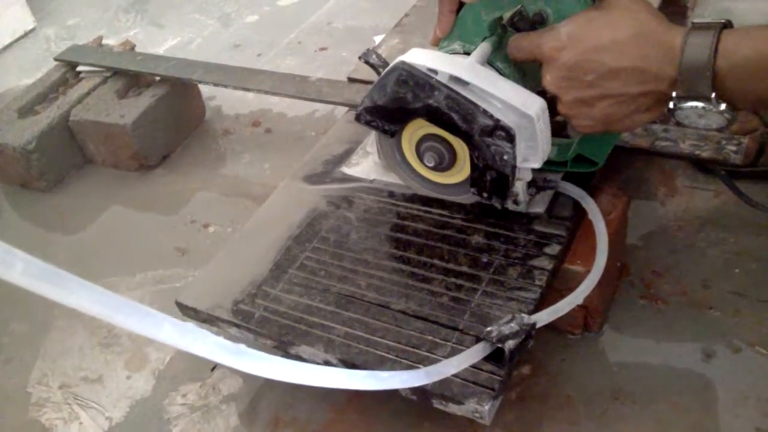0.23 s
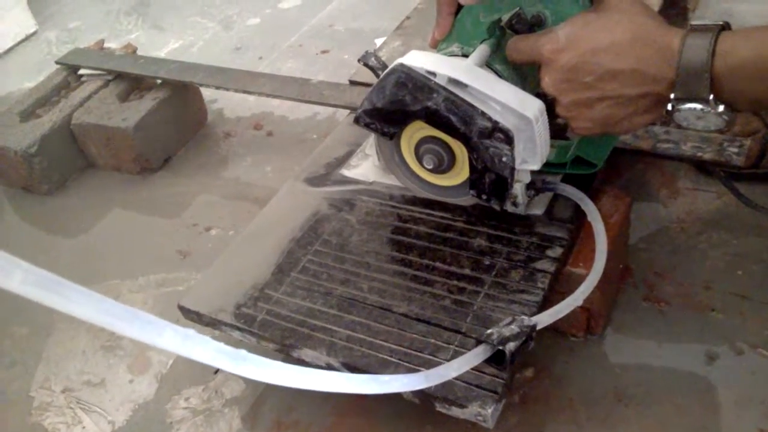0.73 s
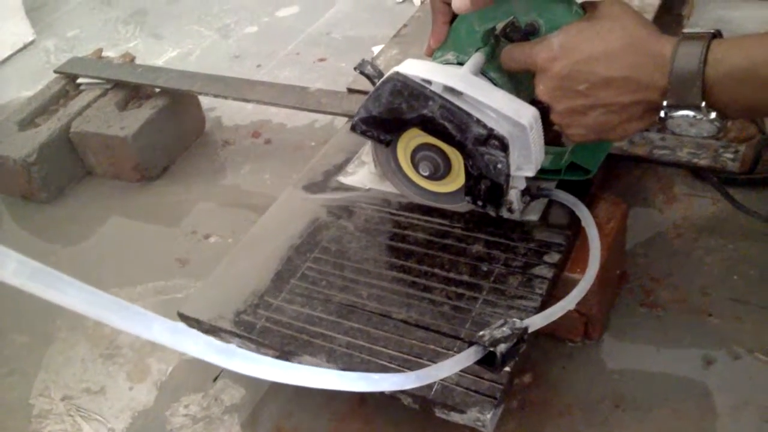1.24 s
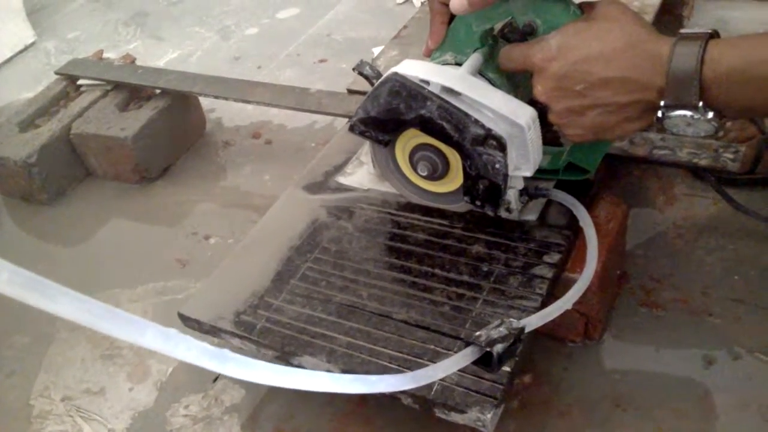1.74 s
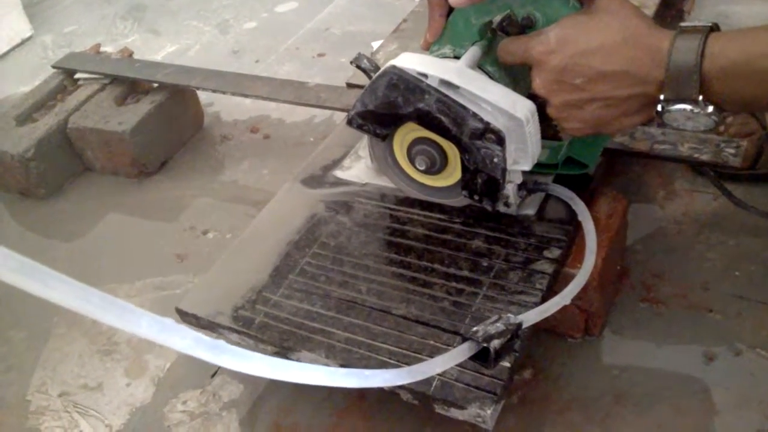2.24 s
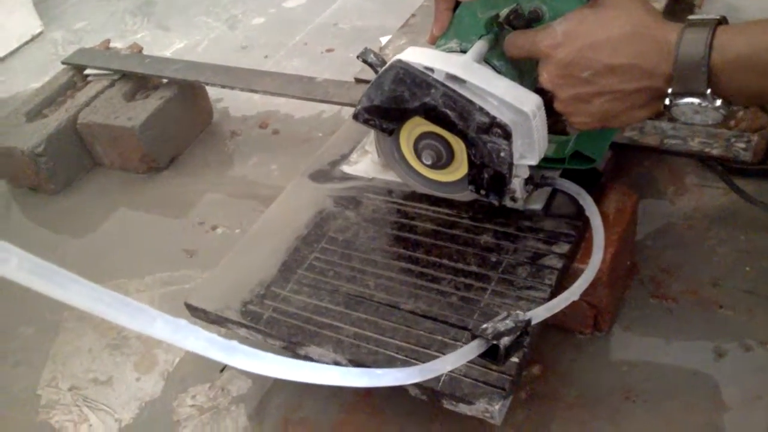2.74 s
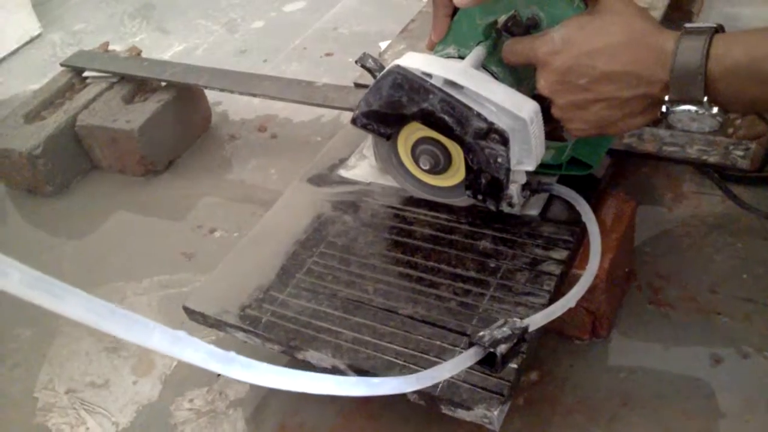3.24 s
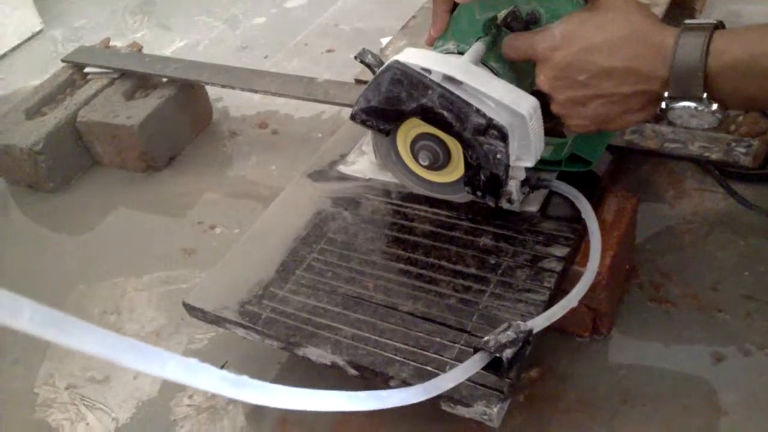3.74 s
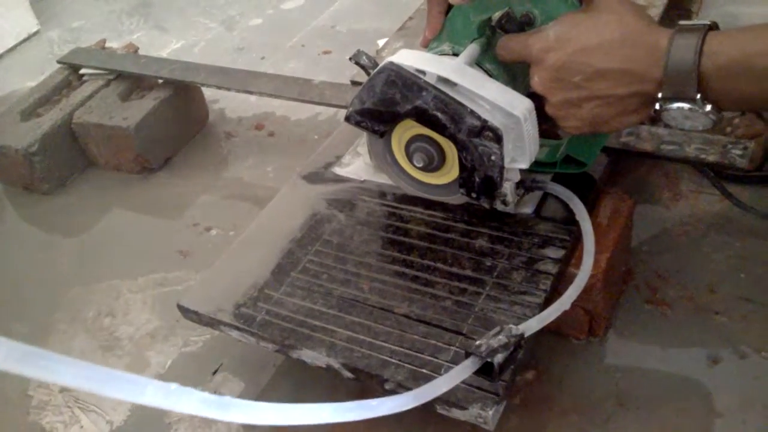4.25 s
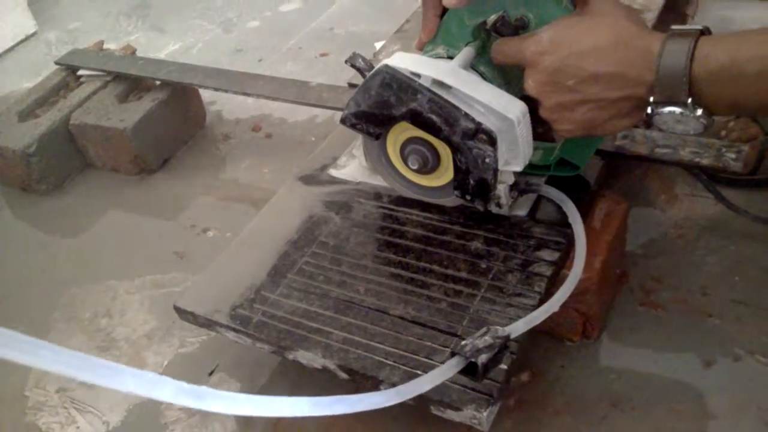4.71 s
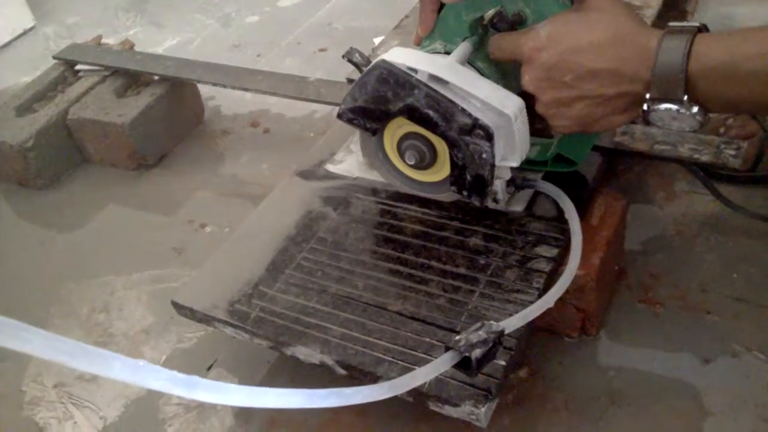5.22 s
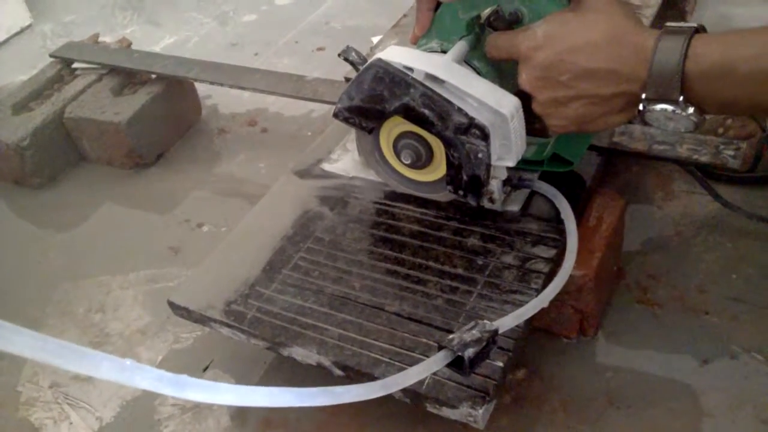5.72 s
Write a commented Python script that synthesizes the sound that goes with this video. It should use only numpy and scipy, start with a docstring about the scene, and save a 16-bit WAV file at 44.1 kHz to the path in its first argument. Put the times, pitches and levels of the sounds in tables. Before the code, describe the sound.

Close and dry, a power saw is already cutting stone at the start and is still cutting at the end. A dense metallic rasp and bright hiss dominate, with a high, nearly steady motor whine that weakens and returns. Beneath lie a rough midrange housing buzz and a very faint low drone. Quick uneven pulses, small catches and brief pure squeals keep the grinding restless. Mono, with no audible echo.

```python
"""An electric cutter's diamond blade is pushed along a wet stone slab: grit impacts ring its modes in many bands.
Feed, bites about eleven times a second, snags and lulls set the force on the stone; brief squeals sound on top.
The motor whines at its slot rate and sags in speed, with shaft, spindle and bearing tones.
Shaped noise makes the spray and cooling air; noise through resonances makes the housing and drone."""
import sys
import numpy as np
from scipy import signal
from scipy.fft import rfft, irfft, next_fast_len
from scipy.io import wavfile

SR = 44100
rng = np.random.default_rng(int(sys.argv[2]) if len(sys.argv) > 2 else 0)


def wav_out(sig):
    """Save sig, one row per channel (or a flat mono array), as 16-bit PCM at SR to the path in sys.argv[1]."""
    wavfile.write(sys.argv[1], SR, np.round(np.clip(np.atleast_2d(sig).T, -1, 1) * 32767).astype(np.int16))


N = 263271
TIME_S = np.arange(N) / SR
GEAR_RATIO = 19 / 37   # spindle turns per shaft turn


def from_db(db):
    """Decibels to amplitude gain."""
    return 10 ** (np.asarray(db) / 20)


def rms_one(x):
    """Scale to rms 1."""
    return x / np.sqrt(np.mean(x ** 2) + 1e-20)


def white_noise():
    """White noise of spread 1."""
    return rng.standard_normal(N)


def in_time(rows):
    """Interpolate each column of a curve at every sample; the first column is seconds."""
    row_s, *columns = np.transpose(rows)
    return [np.interp(TIME_S, row_s, column) for column in columns]


def drift(corner_hz):
    """Slow random wander of rms 1: noise through a two-pole lowpass, at a fortieth of the sample rate."""
    step, settle = 40, 2000
    pole = np.exp(-2 * np.pi * corner_hz * step / SR)
    noise = rng.standard_normal(N // step + settle + 2)
    slow = signal.lfilter([1], [1, -2 * pole, pole ** 2], noise)[settle:]
    return np.interp(np.arange(N) / step, np.arange(len(slow)), rms_one(slow))


def swell(centre_s, spread_s):
    """The samples around a moment, and a Gaussian rise and fall over them."""
    first = max(int((centre_s - 5 * spread_s) * SR), 0)
    near = slice(first, int((centre_s + 5 * spread_s) * SR))
    return near, np.exp(-0.5 * ((TIME_S[near] - centre_s) / spread_s) ** 2)


def resonate(x, centre_hz, width_hz):
    """Two equal resonances in series: a band with steep skirts, rms 1."""
    pole = np.exp(-np.pi * width_hz / SR)
    numerator = [1 - pole, 0, pole - 1]
    denominator = [1, -2 * pole * np.cos(2 * np.pi * centre_hz / SR), pole ** 2]
    section = numerator + denominator
    return rms_one(signal.sosfilt([section, section], x))


def resonant_noise(resonances):
    """Turbulence and vibration sound a set of resonances, each from its own noise."""
    return sum(from_db(level_db) * resonate(white_noise(), centre_hz, width_hz)
               for centre_hz, width_hz, level_db in resonances)


def colour(x, spectrum):
    """Give white noise of rms 1 a spectrum in dB per Hz, interpolated over log frequency."""
    size = next_fast_len(N)
    point_hz, point_db = np.transpose(spectrum)
    bin_hz = np.maximum(np.arange(size // 2 + 1) * SR / size, 1)
    density_db = np.interp(np.log(bin_hz), np.log(point_hz), point_db)
    gain = from_db(density_db) * np.sqrt(SR / 2)
    return irfft(rfft(x, size) * gain, size)[:N]


def tone(turns, rms_db):
    """A sine of the given rms level, one cycle per turn, from a random phase."""
    return np.sqrt(2) * from_db(rms_db) * np.sin(2 * np.pi * (turns + rng.random()))


def mains_hum():
    """The windings hum on a harmonic of the supply."""
    return tone(200 * TIME_S, rms_db=-74.5)


# Rush of cooling air. Each row: frequency in Hz, density in dB per Hz.
AIR_SPECTRUM = [(20, -94), (100, -97), (300, -85), (520, -76.5), (900, -78), (1900, -69), (3000, -68),
                (6000, -72), (15600, -106.5)]


def cooling_air():
    """Steady air turbulence: white noise given a broad spectrum."""
    return colour(white_noise(), AIR_SPECTRUM)


# Resonances of housing and guard. Each row: centre in Hz, width in Hz, rms level before force in dB.
HOUSING_RESONANCES = [(425, 43, -60.5), (633.6, 20, -57.5), (752, 87, -47), (817, 160, -48.5),
                      (983, 146, -44.5), (1068.4, 106, -44), (1151, 57, -47.5), (1264, 90, -47),
                      (1383, 61, -47.5), (1473, 68, -44), (1610, 130, -48), (1663, 58, -55.5)]
# Dull drone of the tool on the slab. Each row: centre in Hz, width in Hz, rms level before force in dB.
DRONE_RESONANCES = [(43, 14, -71), (203, 56, -70)]


def housing_and_drone(low_db):
    """Vibration excites the body resonances; the drone follows the low-mode force fully, the housing by a quarter."""
    housing = from_db(0.25 * low_db) * resonant_noise(HOUSING_RESONANCES)
    drone = from_db(low_db) * resonant_noise(DRONE_RESONANCES)
    return housing + drone


# Motor speed, sagging under load. Each row: time in seconds, shaft speed in turns per second.
SHAFT_SPEED = [(0.0, 412.6), (0.33, 410.5), (0.62, 407.3), (1.6, 408.0), (2.9, 412.1), (3.85, 412.3),
               (4.25, 414.0), (5.02, 414.6), (5.38, 410.2), (5.97, 411.0)]


def motor_speed():
    """Shaft speed in turns per second, and the turns accumulated since the start."""
    speed_hz, = in_time(SHAFT_SPEED)
    return speed_hz, np.cumsum(speed_hz) / SR


# Motor whine before flutter. Each row: time in seconds, rms level in dB.
WHINE_LEVEL = [(0.0, -33.5), (0.33, -33), (0.45, -41.5), (1.5, -38.5), (1.95, -41.5), (2.3, -31.5),
               (2.8, -33), (4.1, -33.5), (4.7, -45.5), (5.35, -33), (5.97, -33)]
# Shaft tones before swell and wander. Each row: multiple of shaft speed, rms level in dB.
SHAFT_TONES = [(1, -57), (2, -52), (11, -63), (13, -50), (24, -60)]
# Spindle tones before wander. Each row: multiple of spindle speed, rms level in dB.
SPINDLE_TONES = [(1, -68.5), (2, -60.5), (3, -59.5), (6, -51), (8, -50), (14, -55), (15, -49.5)]
SLOTS = 12
BEARING_ORDERS = (2.575, 3.54)   # cycles per shaft turn
BEARING_DB, BEARING_DB_PER_SAG_HZ = -44.5, 0.8   # first bearing at mean speed; rise as the motor slows


def motor(speed_hz, turns, slip_turns, flutter_db, second_bearing_db, shaft_share):
    """Armature slots whine, the shaft hum swells with them, and bearing tones waver as the balls slip."""
    whine_db, = in_time(WHINE_LEVEL)
    slot_turns = SLOTS * turns + 0.018 * drift(25)
    out = tone(slot_turns, whine_db + flutter_db * drift(4.7))
    swell_db = shaft_share * (whine_db - whine_db.mean())
    for order, level_db in SHAFT_TONES:
        out += tone(order * turns, level_db + swell_db + 1.2 * drift(7.0))
    for order, level_db in SPINDLE_TONES:
        out += tone(order * GEAR_RATIO * turns, level_db + 1.6 * drift(4.3))
    bearing_db = BEARING_DB + BEARING_DB_PER_SAG_HZ * (speed_hz.mean() - speed_hz)
    for order, level_db in zip(BEARING_ORDERS, (bearing_db, second_bearing_db)):
        out += tone(order * turns + slip_turns * drift(1.95), level_db + 1.5 * drift(17))
    return out


# Steady pressure on the cut. Each row: time in seconds, force on low blade modes in dB, on high modes in dB.
FEED_PRESSURE = [(0.0, 1.5, 1), (0.4, 1, 1.5), (1.2, -0.7, 0), (1.7, -2.5, -0.7), (2.9, -1.9, 0.2),
                 (3.6, -1.2, -0.9), (4.7, 0, -1), (5.3, 3.5, 1.2), (5.97, 1.5, -1.3)]
# The rim snags on the stone. Each row: centre in seconds, rise of low modes in dB, rise of high modes in dB.
RIM_SNAGS = [(.338, 3, 3), (.397, 4.5, 1.5), (.485, 2.5, 2), (1.132, 5, 1), (1.408, 4, 4), (1.692, 4, 2),
             (2.41, 2, 1.5), (2.898, 3, 4.5), (3.322, 8.5, 1.5), (3.481, 3, 2), (4.261, -1, 1.5),
             (4.587, 3, 4), (5.295, 2.5, 4.5), (5.424, 3, 1), (5.644, 4, 2)]
# The rim eases off the stone. Each row: centre in seconds, dip in dB.
RIM_LULLS = [(.22, -2), (.56, -2), (.83, -2.5), (2.76, -1.5), (4.18, -6), (4.73, -3), (4.85, -2.5)]
BITES_PER_S, FIRST_BITE_S = 11.11, 0.048
BITE_DB, BITE_UNEVENNESS = 0.9, 0.55   # mean swing; share by which it wanders


def contact(snag_s, lull_s, lull_low_share, judder_db, judder_hz):
    """Force of the rim on the stone, in dB for low and high modes: feed, bites, snags, lulls and fine judder."""
    low_db, high_db = in_time(FEED_PRESSURE)
    for centre_s, low_rise_db, high_rise_db in RIM_SNAGS:
        near, bump = swell(centre_s, snag_s)
        low_db[near] += low_rise_db * bump
        high_db[near] += high_rise_db * bump
    for centre_s, dip_db in RIM_LULLS:
        near, bump = swell(centre_s, lull_s)
        low_db[near] += lull_low_share * dip_db * bump
        high_db[near] += dip_db * bump
    bite_swing_db = BITE_DB * (1 + BITE_UNEVENNESS * drift(5.1))
    bites_db = bite_swing_db * np.cos(2 * np.pi * BITES_PER_S * (TIME_S - FIRST_BITE_S))
    common_db = bites_db + judder_db * drift(judder_hz)
    return low_db + common_db, high_db + common_db


def grit(spindle_turns, runout_db, clump_db, size_db):
    """Strength of grain impacts: uneven, in clumps, and harder once per turn of the blade."""
    grain_db = size_db * np.minimum(rng.exponential(1, N), 6)
    runout = runout_db * np.sin(2 * np.pi * spindle_turns)
    return rms_one(from_db(grain_db + clump_db * drift(270) + runout))


# Crushed stone and spray before force. Each row: frequency in Hz, density in dB per Hz.
SPRAY_SPECTRUM = [(1000, -96.5), (3100, -69.5), (4100, -66.5), (4750, -82.5), (6300, -70.5), (7200, -82.5),
                  (8500, -74), (9700, -82.5), (11600, -79.5), (12800, -82), (13800, -86), (15600, -91)]


def spray(impacts, low_db, high_db):
    """Crushed stone and water hiss off the rim, louder when it presses harder."""
    hiss = colour(impacts * white_noise(), SPRAY_SPECTRUM)
    return from_db(0.23 * low_db + 0.99 * high_db) * hiss


# Modes of the spinning blade. Each row: centre in Hz, width in Hz, rms level before force and ring gain in dB,
# change from start to end of the cut in dB.
BLADE_MODES = [(3355, 103, -43, -2), (3465, 60, -45, 0), (3549, 72, -35, -3), (3763, 42, -42, -10),
               (3815, 45, -45, -4), (3885, 85, -37, -3), (3985, 100, -37, 0), (4075, 110, -41, 8),
               (4265, 309, -41, 2), (4445, 100, -35, 6), (4515, 105, -38, 5), (5287, 138, -37, 0),
               (5361, 70, -40, -1), (6286, 75, -45, -1), (6540, 62, -39, -1), (7975, 55, -43, -5),
               (8203, 104, -45, 2), (8416, 188, -49, 0), (8896, 123, -57, 10), (9080, 102, -48, 6),
               (9532, 98, -55, 8), (9884, 119, -53, -4), (10330, 149, -52, 0), (10495, 206, -51, 4),
               (10984, 207, -52, -3), (11160, 130, -49, 1), (12361, 160, -52, -2), (13005, 90, -48, -3),
               (14400, 550, -55, 0), (15318, 129, -62, 2)]
# The rim rubs in the slot. Each row: centre in seconds, frequency in Hz (moved to the nearest blade mode),
# rms level at the peak in dB.
RIM_SQUEALS = [(.30, 6540, -31), (.33, 7975, -36), (.48, 3549, -30), (.72, 3720, -25.5), (.77, 3549, -29.5),
               (1.0, 3549, -30), (1.2, 3549, -27), (1.69, 6540, -34.5), (2.40, 7975, -35),
               (2.88, 6540, -33.5), (3.31, 6540, -32), (3.32, 3763, -30), (3.5, 4530, -29.5),
               (3.92, 5280, -32), (4.6, 4440, -26.5), (5.42, 3549, -25), (5.83, 4550, -28)]


def squeals(swell_s, waver_turns):
    """Friction locks onto the nearest blade mode and drives a nearly pure tone that swells and dies."""
    out = np.zeros(N)
    modes_hz = np.array(BLADE_MODES)[:, 0]
    for centre_s, target_hz, peak_db in RIM_SQUEALS:
        near, bump = swell(centre_s, swell_s)
        mode_hz = modes_hz[np.argmin(np.abs(modes_hz - target_hz))]
        turns = mode_hz * TIME_S[near] + waver_turns * drift(8.6)[near]
        out[near] += bump * tone(turns, peak_db)
    return out


def blade(impacts, low_db, high_db, flicker_db, ring_db, top_response):
    """Grains strike every mode with their own strength; the rim wanders, favouring now one mode, now another."""
    out = np.zeros(N)
    advance = TIME_S / TIME_S[-1] - 0.5
    for centre_hz, width_hz, level_db, change_db in BLADE_MODES:
        high_share = np.interp(centre_hz, [4500, 8000], [0, 1])
        response = np.interp(centre_hz, [8000, 12000], [1, top_response])   # top modes need the hardest contact
        force_db = (1 - high_share) * low_db + high_share * response * high_db
        mode_db = level_db + force_db + flicker_db * drift(8.9) + change_db * advance
        out += from_db(mode_db) * resonate(impacts * white_noise(), centre_hz, width_hz)
    return from_db(ring_db) * out


def scene():
    """Sum of all layers; one force drives blade, spray, housing and drone; squeals have their own times and levels."""
    speed_hz, turns = motor_speed()
    low_db, high_db = contact(snag_s=0.012, lull_s=0.022, lull_low_share=1.0, judder_db=0.85, judder_hz=30)
    impacts = grit(GEAR_RATIO * turns, runout_db=1.5, clump_db=0.34, size_db=3.0)
    out = mains_hum() + cooling_air() + housing_and_drone(low_db)
    out += motor(speed_hz, turns, slip_turns=0.14, flutter_db=1.65, second_bearing_db=-47.5, shaft_share=0.63)
    out += spray(impacts, low_db, high_db)
    out += squeals(swell_s=0.034, waver_turns=0.1)
    out += blade(impacts, low_db, high_db, flicker_db=0.65, ring_db=0.16, top_response=1.7)
    return out[None]


def record(dry):
    """A steep elliptic lowpass removes the top above 15650 Hz."""
    lowpass = signal.ellip(12, 0.1, 90, 15650, fs=SR, output="sos")   # order, ripple dB, stopband dB, edge Hz
    return signal.sosfilt(lowpass, dry)


dry = scene()
out = record(dry)
wav_out(out)
```